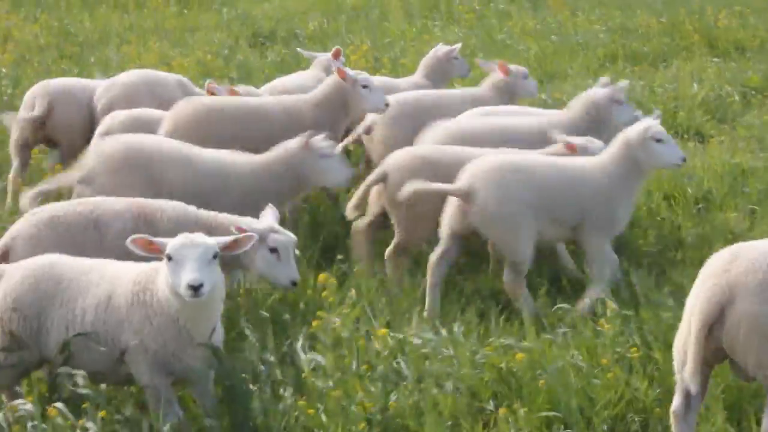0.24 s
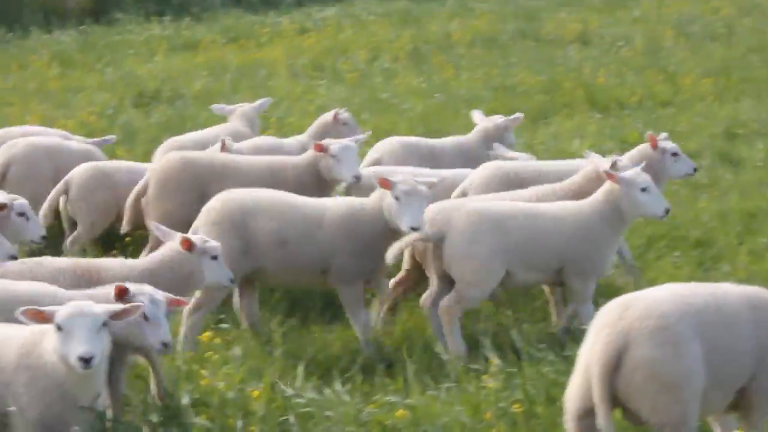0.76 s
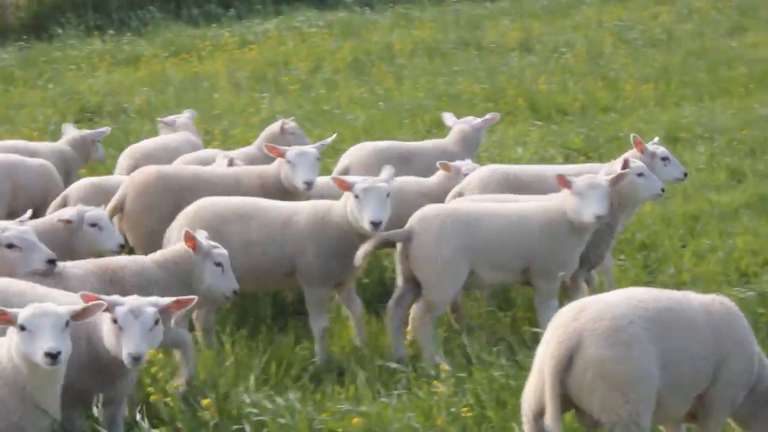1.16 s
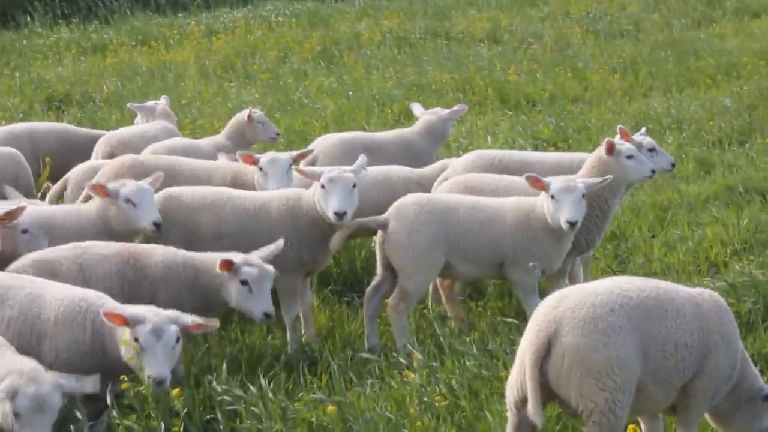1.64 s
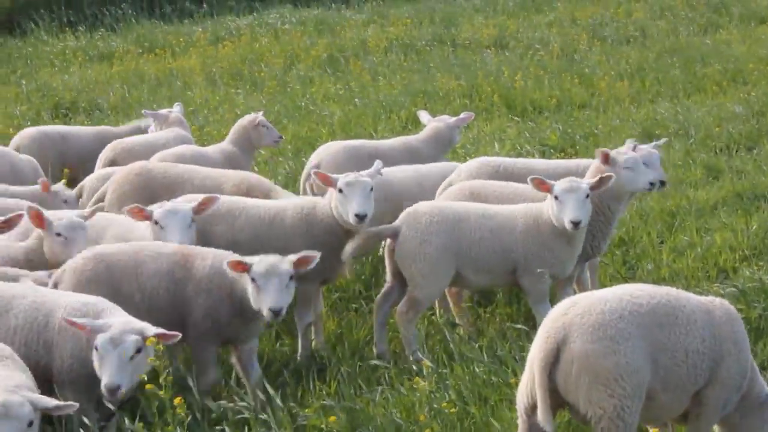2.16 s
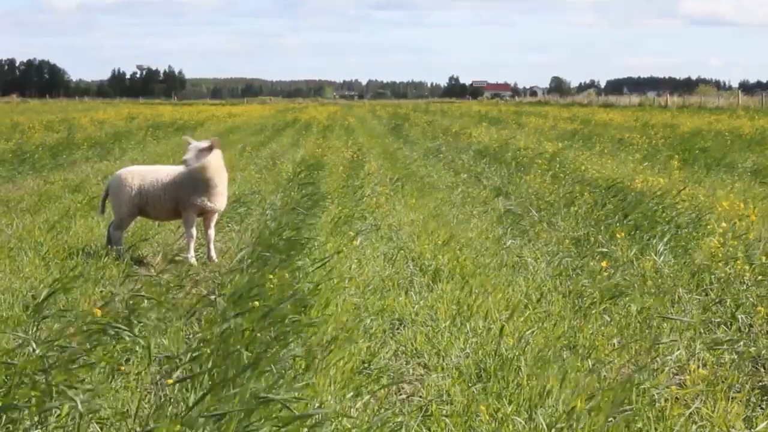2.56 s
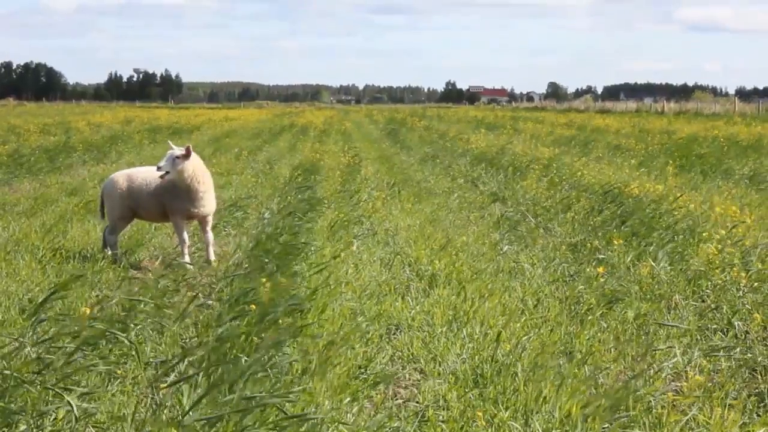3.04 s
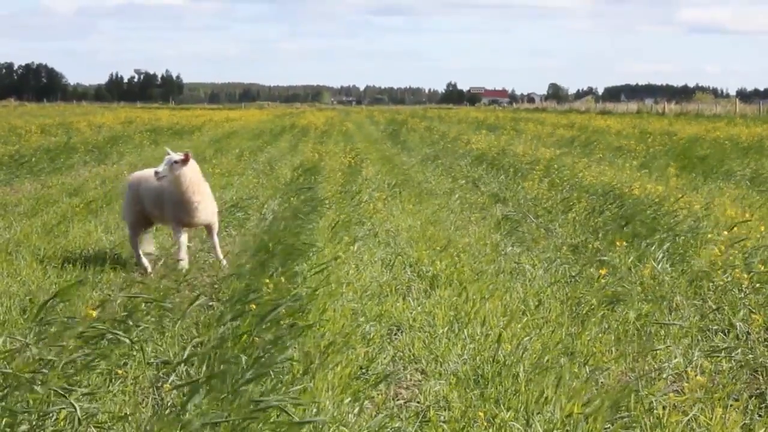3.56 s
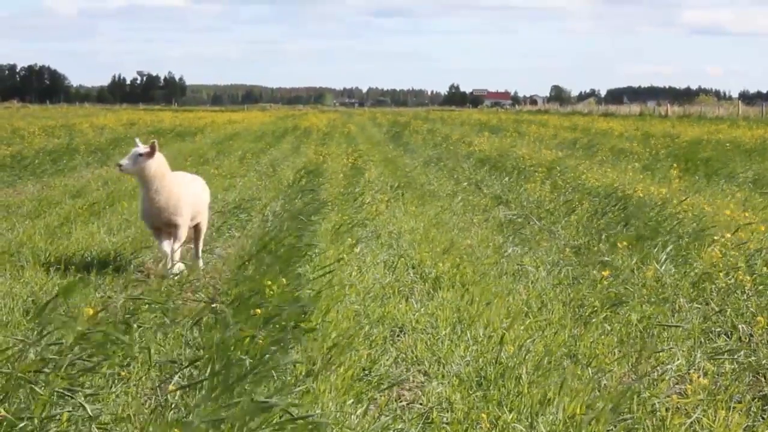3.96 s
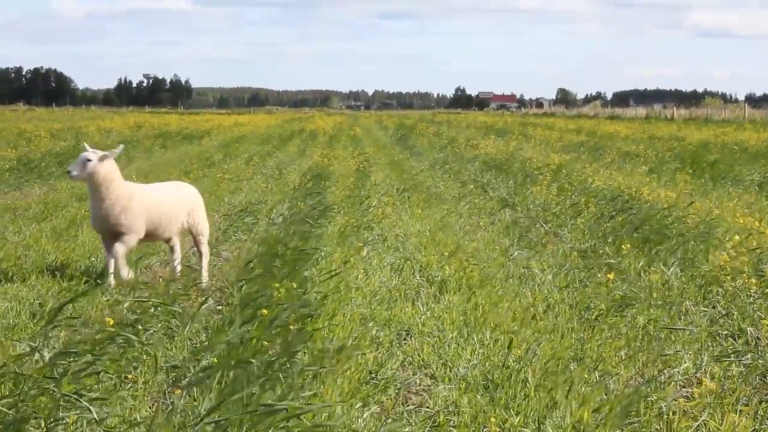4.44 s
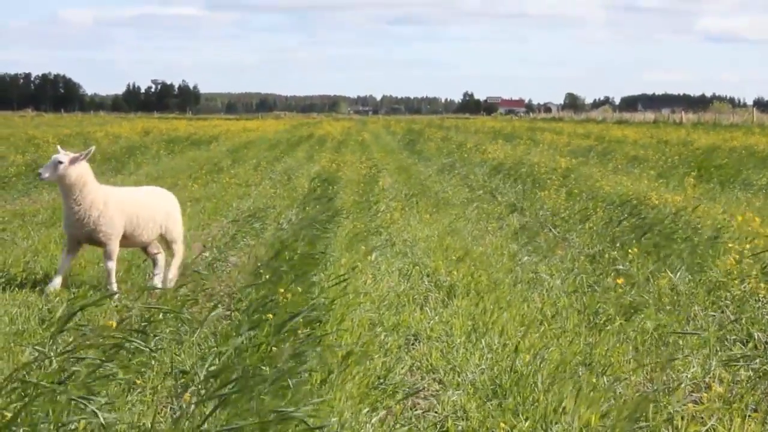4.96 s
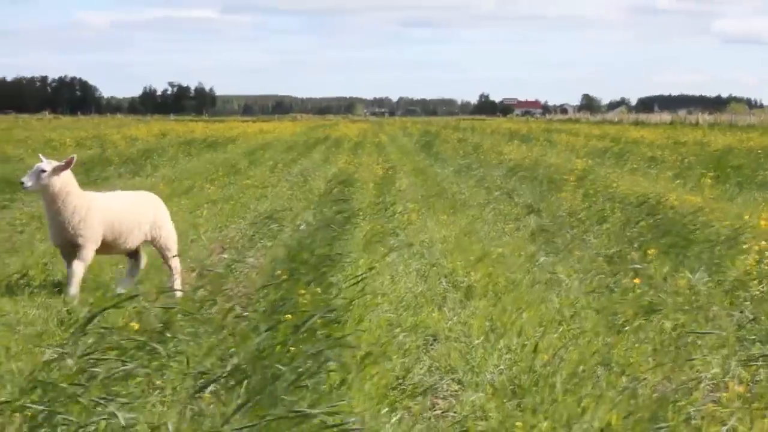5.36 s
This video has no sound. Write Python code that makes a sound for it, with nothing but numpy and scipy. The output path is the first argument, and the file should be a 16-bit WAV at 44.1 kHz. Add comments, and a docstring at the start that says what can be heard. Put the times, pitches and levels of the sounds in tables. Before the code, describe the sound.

Outdoor field, nearly no echo. Soft grass hiss and low wind rumble surround four faint overlapping lamb bleats, followed by a short low bleat. Then a single strong bleat starts nasal, opens bright and shakes with a slowing quaver before closing off. The rest is quieter grass with sparse ticking stalks and a tiny dry rustle, while wind gusts bump the microphone irregularly.

```python
"""Lambs on a windy meadow

Five calls, most of them quavering, come out of a flock, the first four overlapping and the low one alone;
then a single lamb gives one loud bleat.
Each voice is a train of glottal pulses and puffs of air ringing the resonances of a throat or nose.
Wind thumps the microphone with brief pressure swings over a lumpy low rumble.
Grass hisses as coloured noise that flutters quickly, with a few ticking stalks and one rustle."""
import sys
import numpy as np
from scipy import signal
from scipy.fft import rfft, irfft, next_fast_len
from scipy.io import wavfile
from scipy.ndimage import map_coordinates

SR = 44100
rng = np.random.default_rng(int(sys.argv[2]) if len(sys.argv) > 2 else 0)


def transcribe(signal):
    """Save signal, clipped to [-1, 1], as a 16-bit WAV file at the path in sys.argv[1]."""
    frames = np.atleast_2d(signal).T
    limited = np.clip(frames, -1, 1)
    pcm = np.round(limited * 32767).astype(np.int16)
    wavfile.write(sys.argv[1], SR, pcm)


N = 246959  # length [samples]

# Resonances of the loud lamb: (centre [Hz], nominal width [Hz], relative level [dB])
LOUD_THROAT = [(236, 110, -21.5), (976, 104, 2), (1250, 400, -12.5), (2185, 256, 1.5), (3230, 1100, -11),
               (3670, 550, -7.5), (4177, 270, -0.5), (5230, 710, -13.5), (6120, 260, -17), (6880, 260, -24),
               (8300, 680, -29), (10530, 150, -31.5), (11600, 760, -40)]
# Resonances of its nose, heard while the mouth is shut: (centre [Hz], nominal width [Hz], relative level [dB])
NOSE = [(203, 180, -4), (795, 180, -6), (2060, 180, 3.5), (3330, 320, -3), (4160, 240, -1),
        (5500, 2700, -24.5), (10100, 900, -31)]
# Quaver of the loud bleat, deepest as the lamb tires: (time [s], depth [factor])
NEAR_QUAVER = [(2.8, 1.13), (2.99, 0.71), (3.06, 1.22), (3.26, .8), (3.33, 1.8)]
# The mouth opens, which frees the top, then narrows, which dulls the middle:
# (time [s], middle gain [dB], top gain [dB])
BRIGHTNESS = [(2.82, 7, -4.5), (3.05, 3, 3.5), (3.3, 4, 4), (3.36, -7.5, -2), (3.45, -6.5, 3)]
# Throats of the five flock voices, each: (centre [Hz], nominal width [Hz], relative level [dB])
HIGH_THROAT = [(825, 270, -7), (1210, 153, 0), (1660, 270, -11.5), (2356, 240, 4), (3610, 460, -1)]
HOARSE_THROAT = [(947, 110, 1.5), (2000, 350, 1.5), (3600, 3500, -11.5)]
QUAVERING_THROAT = [(990, 140, 7.5), (1840, 1100, -4), (2260, 180, 2.5), (3620, 500, -3)]
FAR_THROAT = [(735, 320, 1.5), (1940, 270, 5.5), (2930, 680, -1.5)]
LOW_THROAT = [(970, 182, 1), (2180, 250, 3.5), (3400, 690, -4), (5400, 520, -7), (6000, 3100, -12)]
# Treble of the low call: (time [s], gain [dB])
LOW_TREBLE = [(2.16, -9), (2.23, -0.5), (2.36, 1)]
# Syllables by voice, with the pitch before scoops and quaver, and the level before accent and quaver:
# (start [s], end [s], first pitch [Hz], middle pitch [Hz], last pitch [Hz],
#  level [dB], level slope [dB/s], attack [s], release [s])
SYLLABLES = { "high": [(.39, 1.11, 279.8, 276.5, 266.5, -58, -4, .08, 0.071)],
             "hoarse": [(.71, 1.28, 203.8, 213.8, 190.4, -55, -12, 0.14, 0.03)],
             "quavering": [(1.18, 1.34, 279, 257.8, 257.6, -54, -67, 0.023, 0.0061),
             (1.335, 1.62, 270, 264.3, 271, -57, 4, 0.035, 0.023)],
             "far": [(1.4, 1.95, 234.9, 240.3, 215.6, -65.5, 0, 0.21, 0.17)],
             "low": [(2.068, 2.13, 222, 228, 226, -65, -30, 0.015, 0.0045),
             (2.125, 2.185, 222, 238.7, 224, -55, -25, .028, .006),
             (2.183, 2.63, 220.9, 213.6, 201.3, -57, -38.5, .004, 0.055)],
             "nasal": [(2.685, 2.768, 144.6, 189.4, 181, -47, -170, 0.045, .01),
             (3.467, 3.503, 187.5, 178, 165, -60.5, -100, 0.013, 0.026)],
             "near": [(2.747, 3.472, 242, 250.5, 222, -42.7, -0.9, .025, 0.057)]}
# Eddies striking the microphone: (time [s], swing peak [dB], strongest frequency [Hz], core level [dB])
BUFFETS = [(0.034, -38.5, 129, -52), (0.088, -34, 148, -52.5), (0.262, -37.5, 215, -52),
           (0.575, -36, 117, -52), (1.066, -36.5, 143, -54), (1.19, -43, 118, -54), (1.303, -27, 116, -40),
           (1.552, -35, 145, -51), (1.691, -39, 111, -56.5), (1.732, -38.5, 177, -61),
           (2.076, -41.5, 184, -60.5), (2.236, -39, 200, -60), (2.357, -34.5, 131, -45),
           (2.384, -33, 171, -53), (2.407, -38, 194, -52), (3.524, -44, 132, -74), (3.723, -28, 189, -43.5),
           (3.745, -37, 203, -57), (3.87, -36, 162, -53), (3.922, -39, 215, -71), (4.083, -32.5, 108, -61),
           (4.21, -39, 110, -63), (4.23, -38, 121, -62), (4.352, -31, 107, -65), (4.916, -38, 129, -61),
           (5.081, -40.5, 207, -51.5), (5.1, -38.5, 135, -45.5), (5.127, -35, 140, -44),
           (5.561, -32, 115, -55)]
# The hardest eddy overloads the microphone with a crack: (time [s], nominal peak [dB])
CRACKS = [(1.3035, -31)]
# Strength of the wind at the microphone, before the rumble's lift: (time [s], level [dB])
TURBULENCE = [(0.0, -69), (0.08, -61.5), (0.73, -75), (1.51, -56), (1.72, -58.5), (1.85, -62),
              (2.09, -72.5), (2.31, -56.5), (2.7, -71.5), (2.9, -79.5), (3.17, -80), (3.49, -72),
              (3.76, -61), (3.9, -59.5), (4.7, -69), (5.13, -54), (5.32, -65.5), (5.6, -70)]
# Colour of the wind rumble: (frequency [Hz], relative density [dB])
RUMBLE_COLOUR = [(20, -9), (100, 3), (200, -3), (400, -20), (600, -33.5), (900, -31), (2000, -100)]
# Grass hiss, before the lift of each kind of grass: (time [s], level [dB])
GRASS_LEVEL = [(0, -69.5), (.65, -66.5), (1.5, -73.5), (1.65, -69), (2.14, -75.5), (2.62, -81),
               (3.6, -84.5), (4.29, -81.5), (5.6, -81.5)]
# Colour of the tall grass around the flock: (frequency [Hz], relative density [dB])
FLOCK_GRASS = [(500, -2), (1000, 0), (3500, 2.5), (7000, -1), (9300, -1), (12000, -3), (15500, -5)]
# Colour of the grass on the open field: (frequency [Hz], relative density [dB])
OPEN_GRASS = [(300, -14), (700, -12), (930, -7), (2500, -13.5), (5600, -16), (6700, -16.5), (9500, -20),
              (15500, -23.5)]
# Ticking grass stalks: (time [s], nominal peak [dB])
TICKS = [(3.608, -63), (3.852, -64.5), (4.4317, -61), (4.5808, -61), (4.7944, -59.5), (5.0297, -56.5),
         (5.3786, -68)]

DIP_S = .0135  # half length of one slackening of the larynx
ACCENT_S = 0.036  # the first push of a bleat dies away
CORE_HZ, CORE_S, CORE_LIFT_DB = 420, .0017, -2  # sharp core of an eddy: pitch, half length, peak over its level
SWIRL_DB = -16  # swirl against the peak of a 150 Hz eddy
SWIRL_RISE_S, SWIRL_DECAY_S = 0.0046, .016
FINE_SWIRL_DB = -7.5  # finer swirl shed by the core, against the core level
RUSTLE_S, RUSTLE_LENGTH_S, RUSTLE_DB = 5.4, 0.036, -76.5  # one brush of dry blades: centre, half length, level
HISS_FLUTTER_DB = 1.2  # typical flutter of the tall grass
TOP_HZ = 15750  # band limit of the whole sound


def near_lamb():
    """One strong bleat: nasal at both ends; between, the mouth opens and the quaver slows down."""
    nasal = voice("nasal", NOSE, mouth=7.6, rough=.12, rasp=.2)
    depth, = curves(NEAR_QUAVER)
    middle_db, top_db = curves(BRIGHTNESS)
    slack = depth * quaver(2.803, 16.35, slowing=4.6)
    call = voice("near", LOUD_THROAT, slack=slack, scoop=.24, scoop_s=.018, accent_db=5.5,
                 sag=.11, sag_db=4.5, mouth=0.66, rough=.055, rasp=.15)
    middle = filtered(call, lambda hz: np.exp(-((hz - 3400) / 600) ** 2))
    top = filtered(call, lambda hz: np.clip((hz - 6000) / 2000, 0, 1))
    call = call + (amp(middle_db) - 1) * middle + (amp(top_db) - 1) * top
    return meadow(nasal + call, scatter_db=-18, t60=.07)


def flock():
    """Five calls from some way off, three clear and two hoarse: four overlapping, then the low one alone."""
    calls = voice("high", HIGH_THROAT, slack=quaver(.563, 7.7), scoop=.08, scoop_s=0.074,
                  sag=.035, sag_db=0.5, mouth=11, rough=.025, rasp=.13)
    calls += voice("hoarse", HOARSE_THROAT, slack=quaver(.782, 12.4),
                   sag=.05, sag_db=7, mouth=3.3, rough=.3, rasp=.5)
    calls += voice("quavering", QUAVERING_THROAT, slack=quaver(1.41, 13.5),
                   sag=0.1, sag_db=15, mouth=1.4, rough=.05, rasp=.18)
    calls += voice("far", FAR_THROAT, mouth=6.3, rough=.18, rasp=.4)
    low = voice("low", LOW_THROAT, slack=quaver(2.278, 16.0),
                sag=0.037, sag_db=5.0, mouth=1.7, rough=.12, rasp=.12)
    treble = filtered(low, lambda hz: np.clip((hz - 2600) / 2500, 0, 1))
    treble_db, = curves(LOW_TREBLE)
    calls += low + (amp(treble_db) - 1) * treble
    return meadow(calls, scatter_db=-15, t60=.1)


def voice(name, throat, mouth, rough, rasp, slack=0, sag=0, sag_db=0, **onset):
    """All syllables of one voice; pitch and level sag together wherever the larynx slackens."""
    out = np.zeros(N)
    for syllable in SYLLABLES[name]:
        hz, db, sounding = course(syllable, **onset)
        weak_db = db.max() - db
        hz = hz * (1 - sag * slack) * (1 + .005 * wobble(60))
        flutter_db = .5 * wobble(40)
        level_db = db - sag_db * slack + flutter_db
        out += bleat(hz, level_db, weak_db, sounding, throat, mouth, rough, rasp)
    return out


def course(syllable, scoop=0, scoop_s=.016, accent_db=0):
    """Pitch may scoop into one arch; level attacks, slopes and releases. Gives Hz, dB and when it sounds."""
    start, end, first_hz, middle_hz, last_hz, db, slope, attack, release = syllable
    t = np.arange(N) / SR
    length = end - start
    age = np.clip(t - start, 0, length)
    arch = np.polyval(np.polyfit([0, .5, 1], [first_hz, middle_hz, last_hz], 2), age / length)
    # where there is a scoop, the pitch drops again as the voice stops
    slump = np.exp(-age / scoop_s) + np.exp(-(length - age) / .016)
    gate = np.clip(np.minimum((age / attack) ** 1.37, (end - t) / release), 1e-3, 1)
    level = db + slope * age + accent_db * np.exp(-age / ACCENT_S) + 20 * np.log10(gate)
    return arch * (1 - scoop * slump), level, (t > start) & (t < end)


def quaver(first_s, per_s, slowing=0):
    """The larynx slackens in brief dips, 0 to 1, at a steady or slowing rate (slowing: dips per s, per s)."""
    age = np.arange(N) / SR - first_s
    beat = per_s * age - slowing * age ** 2 / 2
    nearest = np.maximum(np.round(beat), 0)
    return np.exp(-np.abs((beat - nearest) / per_s / DIP_S) ** 2.26)


def bleat(hz, db, weak_db, sounding, throat, mouth, rough, rasp):
    """Glottal pulses ring the throat; the mouth opens with pitch and lifts the resonances (mouth: Hz per Hz)."""
    cycles = np.cumsum(hz * sounding) / SR
    at = np.interp(np.arange(1, np.ceil(cycles[-1])), cycles, np.arange(N))  # pulse places [samples]
    now = at.astype(int)
    chance = rng.standard_normal((256, 162))[:len(at)]
    late, louder, breath = chance[:, 0], chance[:, 1], chance[:, 2:]

    # a weakening voice pulses unevenly, in time and in strength
    uneven = np.minimum(rough * amp(weak_db[now] * .7), 1)
    at = at + late * uneven * .0002 * SR
    strength = amp(db[now] + louder * 4 * uneven) * np.sqrt(SR / hz[now])  # holds the level at any pitch
    rings = throat_rings(throat, mouth * (hz[now] - np.median(hz[now])))
    size = 2 * (rings.shape[1] - 1)
    f = np.fft.rfftfreq(size, 1 / SR)

    # a puff of air follows each closure; it takes over towards the treble
    puff = breath * np.exp(-np.linspace(0, 2, breath.shape[1]))
    puff_size = np.linalg.norm(puff, axis=1)[:, None]
    air = rasp * unit(puff_size) * rfft(puff / puff_size, size)
    closure = np.exp(-2j * np.pi * f * (at % 1)[:, None] / SR)  # placed between samples
    pulses = strength[:, None] * irfft(rings * (air * (1 + (f / 8500) ** 4) - closure))
    index = at.astype(int)[:, None] + np.arange(size)
    return np.bincount(index.ravel(), pulses.ravel(), N)[:N]


def throat_rings(resonances, lift_hz, size=2048):
    """The causal spectrum of a throat for each pulse, its resonances lifted; steep skirts, dark valleys."""
    hz = np.fft.rfftfreq(size, 1 / SR)
    offset = hz - lift_hz[:, None]
    power = sum(amp(db) ** 2 / (1 + ((offset - centre) / (width * 0.67)) ** 2) ** 1.9
                for centre, width, db in resonances)
    power = power / (1 + (hz / 12300) ** 40)
    # folding the cepstrum makes the ring minimum phase: it starts at the pulse
    cepstrum = irfft(np.log(power + 1e-13) / 2)
    cepstrum[:, 1:size // 2] *= 2
    cepstrum[:, size // 2:] = 0
    return np.exp(rfft(cepstrum)) / np.sqrt(power.mean(axis=1, keepdims=True))


def meadow(x, scatter_db, t60):
    """Grass and the other animals scatter a faint, short tail."""
    t = np.arange(SR // 3) / SR
    tail = rng.standard_normal(len(t)) * amp(-60 * t / t60) * (t > .004)
    return x + amp(scatter_db) * signal.fftconvolve(x, tail / np.linalg.norm(tail))[:N]


def buffets():
    """Each eddy is a brief pressure swing with a sharp core, in a little swirl; smaller eddies sound higher."""
    t, out = np.arange(N) / SR, np.zeros(N)
    swirl = noise([(30, -31), (120, 5), (280, 4.5), (520, -10.5), (900, -32.0), (3000, -66)])
    fine = amp(FINE_SWIRL_DB) * noise([(200, -22), (430, 3), (580, -5.5), (850, -22), (3000, -65)])
    turns = rng.uniform(0, 2 * np.pi, len(BUFFETS))
    for (s, db, hz, core_db), turn in zip(BUFFETS, turns):
        near = np.abs(t - s) < .2
        age = t[near] - s
        core = amp(CORE_LIFT_DB) * np.cos(2 * np.pi * CORE_HZ * age + turn) * np.exp(-(age / CORE_S) ** 2)
        # the swirl outlasts the blow
        wake = np.exp(-np.abs(age) / np.where(age < 0, SWIRL_RISE_S, SWIRL_DECAY_S))
        around = amp(SWIRL_DB) * hz / 150 * swirl[near] * wake
        out[near] += amp(db) * (swing(age, hz, turn) + around)
        out[near] += amp(core_db) * (core + fine[near] * wake)
    return out + cracks()


def swing(age, hz, turn):
    """One brief swing of pressure, strongest at hz."""
    return np.real(np.exp(1j * turn) / (1 - 2j * np.pi * hz * age / 3) ** 4)


def cracks():
    """An overloaded microphone cracks: a very short burst of noise, fading on both sides of the blow."""
    t = np.arange(N) / SR
    crack = noise([(200, -10), (700, 0), (2000, -6), (5000, -38), (12000, -60)])
    # the noise is set 7 dB under the nominal peak
    return sum(amp(peak_db - 7) * crack * np.exp(-np.abs(t - s) / .0008) for s, peak_db in CRACKS)


def rumble(over_db=6, lumps_db=5.0):
    """Lumpy low turbulence between the thumps."""
    db, = curves(TURBULENCE)
    lumpy = unit(noise(RUMBLE_COLOUR) * amp(lumps_db * wobble(35)))
    return amp(db + over_db) * lumpy


def grass():
    """Tall grass hisses around the flock; the open field is quieter, with a few ticking stalks and a rustle."""
    t = np.arange(N) / SR
    db, = curves(GRASS_LEVEL)
    tall, = curves([(2.3, 1), (2.65, 0)])  # share of tall grass
    around = amp(5.7 + HISS_FLUTTER_DB * wobble(20)) * noise(FLOCK_GRASS)
    beyond = amp(5.0 + 0.47 * wobble(8.2)) * noise(OPEN_GRASS)
    hiss = amp(db) * (tall * around + (1 - tall) * beyond)
    snap = noise([(1500, -20), (4500, 6), (12000, -7), (15000, -18)])
    ticks = sum(amp(peak_db - 5.5) * (t > s) * np.exp(-np.abs(t - s) / 0.0029) for s, peak_db in TICKS)
    brush = np.exp(-((t - RUSTLE_S) / RUSTLE_LENGTH_S) ** 2)
    rustle = amp(RUSTLE_DB) * brush * noise([(4000, -17), (11000, 1), (15000, -5)])
    return hiss + ticks * snap + rustle


def noise(spectrum):
    """Noise of rms 1 with a (frequency [Hz], density [dB]) colour."""
    f, db = np.transpose(spectrum)
    return unit(filtered(rng.standard_normal(N), lambda hz: amp(np.interp(np.log(hz + 1), np.log(f), db))))


def filtered(x, response):
    """x times a response of frequency."""
    size = next_fast_len(N + SR // 2)
    return irfft(rfft(x, size) * response(np.fft.rfftfreq(size, 1 / SR)), size)[:N]


def wobble(rate):
    """A smooth random curve, rate knots a second."""
    return map_coordinates(rng.standard_normal(int(N * rate / SR) + 4), [np.arange(N) * rate / SR])


def curves(rows):
    """One value per sample for each column after the time."""
    s, *cols = np.transpose(rows)
    return [np.interp(np.arange(N) / SR, s, c) for c in cols]


def unit(x):
    """Scaled to rms 1."""
    return x / np.sqrt(np.mean(x ** 2) + 1e-20)


def amp(db):
    """Decibels to gain."""
    return 10 ** (np.asarray(db) / 20)


def scene():
    """Lambs, wind and grass at one microphone."""
    return (near_lamb() + flock() + buffets() + rumble() + grass())[None]


def record(dry):
    """Nothing passes above the band limit."""
    return np.array([filtered(channel, lambda hz: hz < TOP_HZ) for channel in dry])


dry = scene()
out = record(dry)
transcribe(out)
```